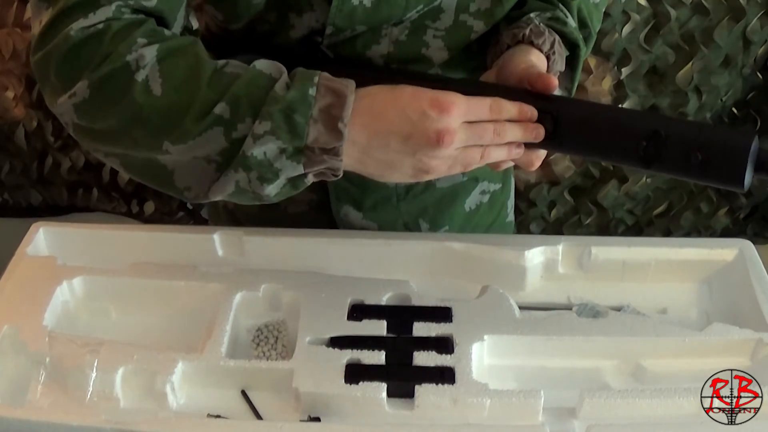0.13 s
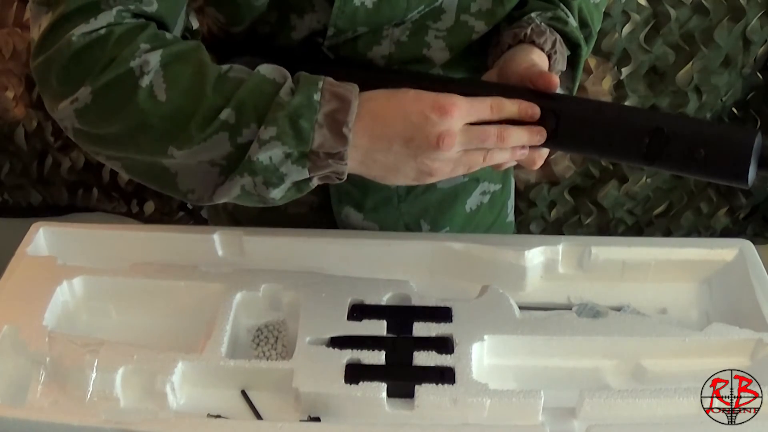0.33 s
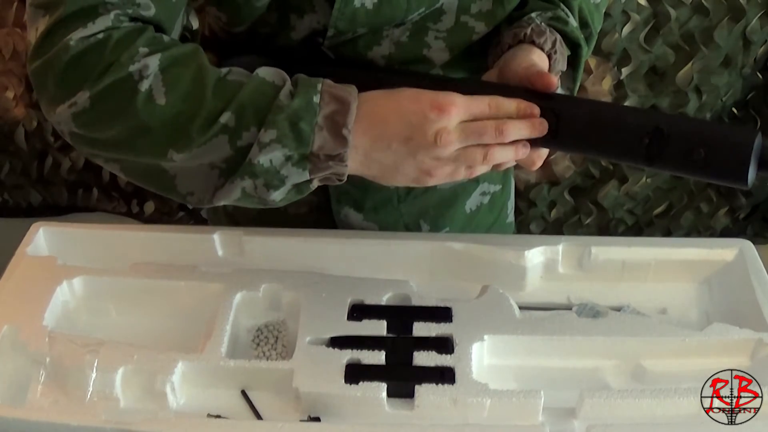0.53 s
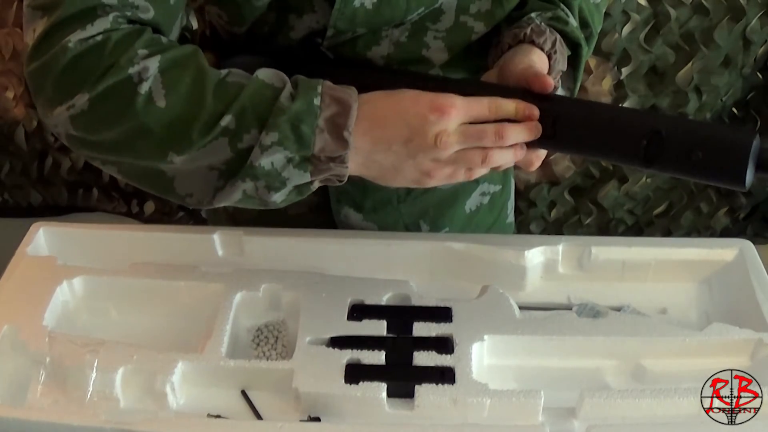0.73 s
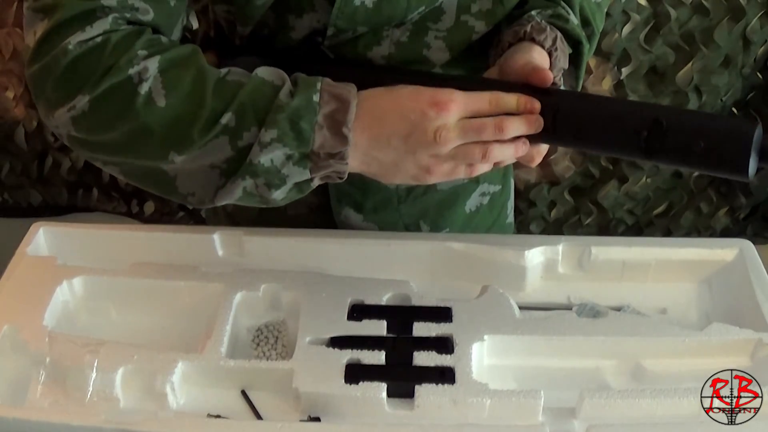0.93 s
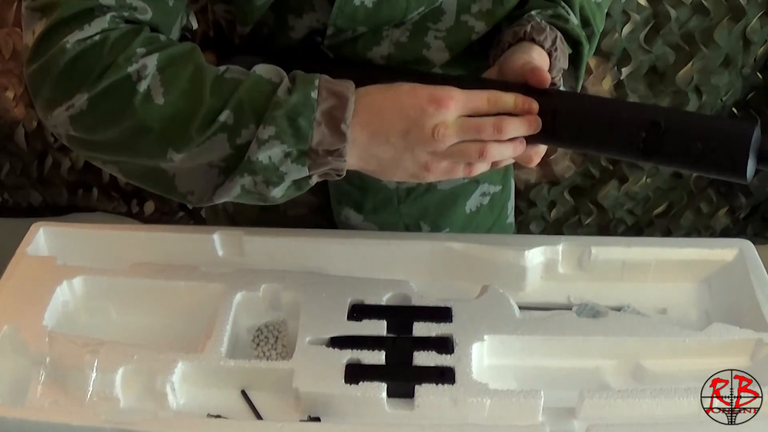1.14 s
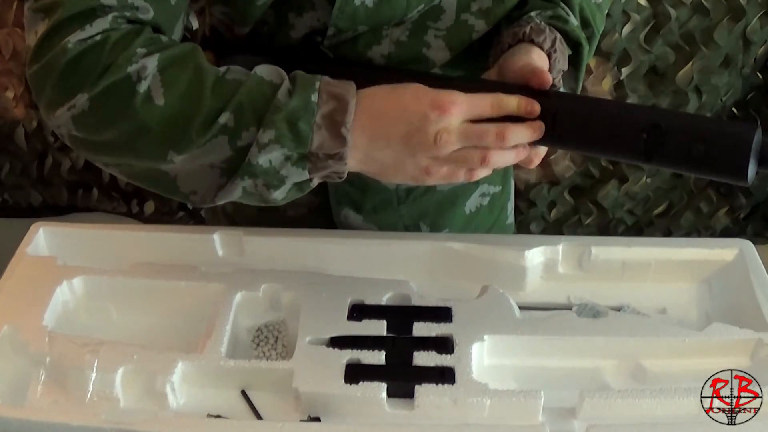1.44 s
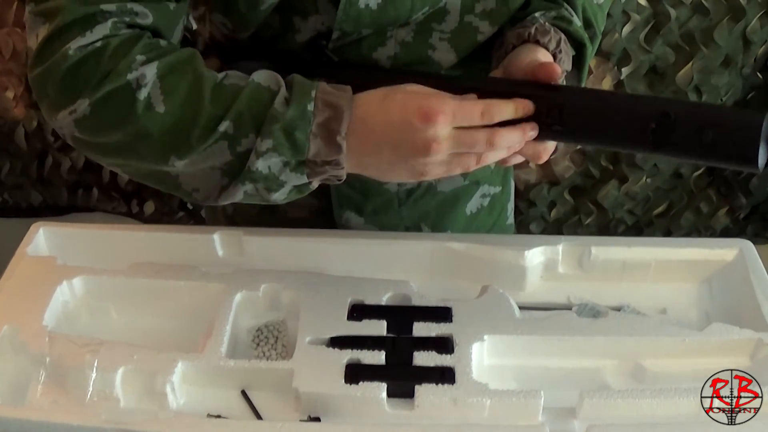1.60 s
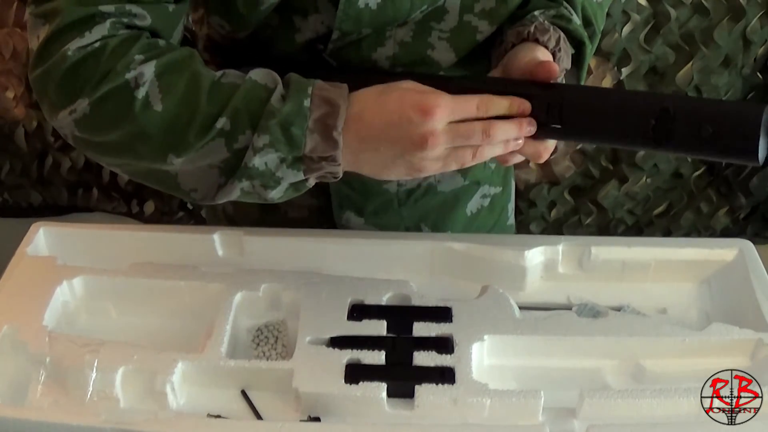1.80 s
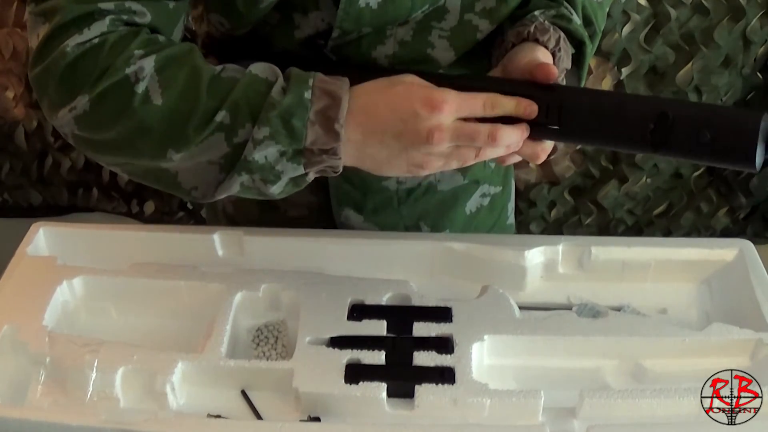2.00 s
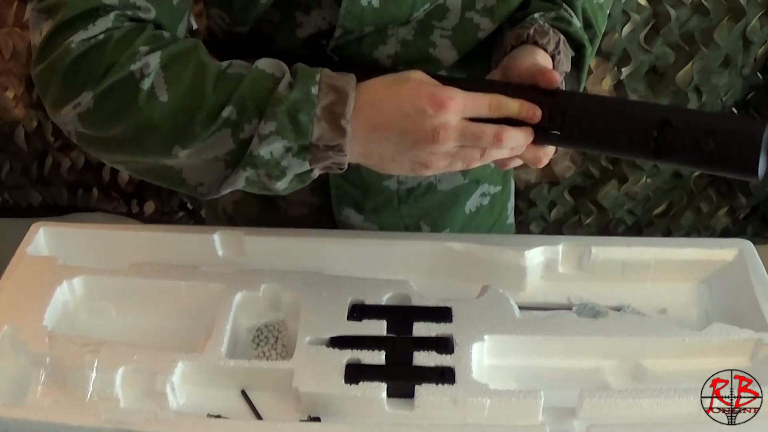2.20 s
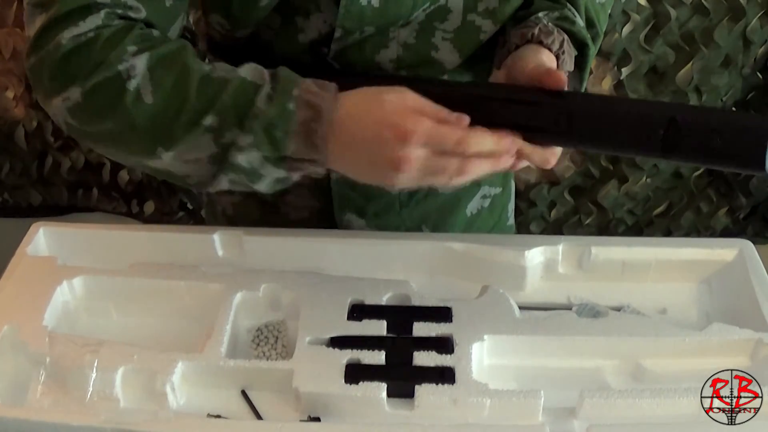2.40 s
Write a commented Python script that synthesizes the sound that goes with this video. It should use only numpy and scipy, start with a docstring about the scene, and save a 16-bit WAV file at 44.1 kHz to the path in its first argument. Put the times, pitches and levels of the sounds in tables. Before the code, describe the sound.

A magazine is fitted into an airsoft rifle, close by in a quiet small room. Light plastic ticks and hollow knocks come in the first half second, with a sharper cluster of clicks at 0.8 seconds and fainter taps from 1.2 to 2. At about 2.1 seconds the catch snaps shut loudly, with a brief metallic ring and rattle. Hands and sleeves rustle softly at the start and end.

```python
"""Hands and sleeves rustle over the faint tone of a small room, as a magazine is worked into an airsoft
rifle. It ticks, scrapes and knocks in the hollow plastic well, each contact shaking the shell, walls,
ribs and metal lips. Then the catch snaps shut, its spring rings and loose parts chatter.
The nearby camera's gain control ducks at the snap and recovers slowly."""
import sys
import numpy as np
from scipy import signal
from scipy.fft import rfft, irfft, next_fast_len
from scipy.io import wavfile
from scipy.ndimage import uniform_filter1d, map_coordinates

SR = 44100
rng = np.random.default_rng(int(sys.argv[2]) if len(sys.argv) > 2 else 0)


def inscribe(sig):
    """Save sig as 16-bit PCM at rate SR to the path in sys.argv[1].

    A 1-D sig is mono; a 2-D sig holds one channel per row.
    Samples are clipped to [-1, 1] before scaling.
    """
    pcm = np.round(np.clip(np.atleast_2d(sig).T, -1, 1) * 32767)
    wavfile.write(sys.argv[1], SR, pcm.astype(np.int16))


N = 112454
HIT_T_S = np.arange(SR // 2) / SR


def amp(db):
    """Decibels to gain."""
    return 10 ** (np.asarray(db) / 20)


def unit_rms(x):
    """Scale to rms 1."""
    return x / np.sqrt(np.mean(x ** 2) + 1e-20)


def unit_hit(x):
    """Scale to the energy of 4 ms at rms 1."""
    return x * np.sqrt(.004 * SR / np.sum(x ** 2))


def curve_at(points, hz):
    """Interpolate (Hz, value) points on a log frequency axis."""
    point_hz, values = np.transpose(points)
    return np.interp(np.log(hz + 1), np.log(point_hz), values)


def filtered(x, response):
    """Apply a zero-phase gain, response(hz)."""
    n = x.shape[-1]
    n_fft = next_fast_len(n + SR // 4)
    return irfft(rfft(x, n_fft) * response(np.fft.rfftfreq(n_fft, 1 / SR)), n_fft)[..., :n]


def coloured(x, spectrum):
    """Filter by (Hz, dB) points."""
    return filtered(x, lambda hz: amp(curve_at(spectrum, hz)))


def stereo(mid_side, width):
    """Mid and side to left and right."""
    mid, side = mid_side
    return np.array([mid + width * side, mid - width * side])


def add(track, start_s, x):
    """Mix x into the track at start_s."""
    i = round(start_s * SR)
    track[:, i:i + x.shape[-1]] += x[..., :N - i]


def noise_tail(spectrum, t60_curve, rise_s, hold_s):
    """Two noises that rise, hold, then decay, each frequency at its own rate."""
    noise = coloured(rng.standard_normal((2, len(HIT_T_S))), spectrum)
    hz, t, bins = signal.stft(noise, SR, nperseg=256)
    fade = amp(-60 * np.maximum(t - hold_s, 0) / curve_at(t60_curve, hz)[:, None])
    tail = signal.istft(bins * fade, SR, nperseg=256)[1][:, :len(HIT_T_S)]
    return tail * (1 - np.exp(-HIT_T_S / rise_s))


def strike(modes, contact_ms):
    """A rough contact shakes each mode; little radiates outside their range."""
    t = HIT_T_S[:SR // 10]
    hz, db, t60_s = np.transpose(modes)[:, :, None]
    force = rng.standard_normal((len(hz), len(t))) * np.exp(-(1000 * t / contact_ms) ** 2 / 2)
    impulse_responses = amp(-60 * t / t60_s) * np.sin(2 * np.pi * hz * t)
    rings = signal.fftconvolve(force, impulse_responses, axes=1)
    band_hz = [hz.min() * .8, min(hz.max() * 1.5, SR * .4)]
    rings = signal.sosfilt(signal.butter(3, band_hz, "band", fs=SR, output="sos"), rings)
    hit = np.sum(amp(db) * [unit_hit(x) for x in rings], axis=0)
    return unit_hit(np.pad(hit, (0, len(HIT_T_S) - len(hit))))


# Room tone and hiss: (frequency [Hz], relative level [dB])
AIR_SPECTRUM = [(15, -56), (25, -31.5), (134, -12), (326, -5.5), (405, -4.5), (659, -6), (1020, -6.5),
                (1130, -6), (1260, -6.5), (2160, -10), (2550, -5.5), (3250, -10.5), (16000, -18)]


def room_tone(level_db=-56, width=.48):
    """Steady background noise, strongest in the low mids."""
    noise = coloured(rng.standard_normal((2, N)), AIR_SPECTRUM)
    return amp(level_db) * stereo(unit_rms(noise), width)


# Hand and sleeve slides: (peak time [s], rise [s], fall [s], level [dB])
SLIDES = [(.02, 0.045, 0.17, -59), (.165, 0.065, 0.073, -53), (.33, 0.047, .05, -47.5),
          (0.741, 0.031, 0.038, -63), (1.101, 0.14, 0.077, -67), (1.68, 0.11, 0.14, -54.5),
          (1.8, 0.11, .08, -55), (2.0, .05, 0.051, -61), (2.53, 0.17, .1, -51.5)]
# Friction noise: (frequency [Hz], relative level [dB])
CLOTH_SPECTRUM = [(100, -27), (400, -2), (900, 7.5), (1700, 4), (3500, 3), (5300, -2), (7500, 0.5),
                  (9500, 2), (12000, -2), (15500, -36)]


def hand_rustle(grain_db=2, grains_per_s=500, width=.13):
    """Grainy friction of skin and cloth, swelling with each slide."""
    t = np.arange(N) / SR
    power = sum(amp(db) ** 2 * np.exp(-2 * ((t - peak_s) / np.where(t < peak_s, rise_s, fall_s)) ** 2)
                for peak_s, rise_s, fall_s, db in SLIDES)
    roughness = map_coordinates(rng.standard_normal(SR // 10), [t * grains_per_s], mode="wrap")
    friction = coloured(rng.standard_normal((2, N)) * amp(grain_db * roughness), CLOTH_SPECTRUM)
    return np.sqrt(power) * stereo(unit_rms(friction), width)


# Magazine touching the well; the spot touched sets the pitch: (time [s], hollow knock [dB],
# wall clack [dB], rib snap [dB], metal tick [dB], edge fizz [dB], contact length [ms], pitch [ratio])
WELL_CONTACTS = [ (.114, -54, -58, -54, -69, -75, 6, 0.9), (0.1692, -44.5, -46, -56, -67, -75, 3.2, 1.02),
                 (.177, -44, -46.5, -48, -66, -75, 8, 0.97),
                 (0.1886, -47, -59, -38.5, -37, -43.5, 1.27, 0.9),
                 (0.3482, -33, -32.5, -44, -38.5, -65, 2.4, 0.97),
                 (0.3532, -43, -47, -38.5, -46.5, -60, 0.96, 1.04),
                 (0.4083, -68, -60, -49, -45.5, -57, 5.4, 1.09),
                 (0.5409, -44, -49, -38, -53, -65, 2.1, 1.05),
                 (0.547, -49, -45, -34.5, -38, -39.5, 0.81, 0.95),
                 (.742, -53.5, -58, -65, -70, -80, 2.5, 1.03), (0.805, -42.5, -46, -47, -48, -75, 10, 1.05),
                 (0.8127, -43, -46, -34.5, -24.5, -52, 3.2, 0.98),
                 (.822, -32, -41, -31.5, -38, -48, 1.9, 1.23),
                 (0.8239, -40, -39, -30.5, -20, -44, 4.6, 0.99),
                 (0.8263, -37.5, -31, -31, -23, -27.5, 1, 0.9), (.831, -33, -27, -32, -39, -39, 4.3, .98),
                 (1.0546, -58, -61, -71, -60, -58, 1.5, 0.93),
                 (1.2408, -70, -43.5, -43, -40, -65, 5.4, 1.03),
                 (1.2443, -32, -45.5, -42.5, -52, -56, 1.52, 0.972),
                 (1.5087, -58, -61, -66, -47.5, -57, 1.8, 1.04),
                 (1.5363, -60, -55, -51.5, -49.5, -55, 2.9, 0.904),
                 (1.5784, -55, -53, -54, -45, -48, 1.7, 0.97),
                 (1.5815, -45.5, -65, -65, -65, -75, 2.4, 1.08),
                 (1.6455, -42, -54.5, -55, -55, -75, 5.2, 0.93), (1.807, -51, -70, -70, -68, -80, 7.6, .95),
                 (2.007, -53.5, -69, -70, -70, -82, 5.5, 1.07), (2.105, -46, -54, -58, -58, -68, 3.2, 0.83),
                 (2.113, -40.5, -56, -56, -56, -70, 1.8, 1.09),
                 (2.1178, -36.5, -42, -52, -35, -42, 1.3, .95),
                 (2.300, -43.5, -56, -47.5, -56, -67, 11, 0.954),
                 (2.360, -48, -63, -54, -54, -76, 1.3, 1.14)]
# Modes of the five parts: (frequency [Hz], relative level [dB], t60 [s])
HOLLOW_MODES = [(780, -5, .04), (875, -3, .045), (1040, 0, .034), (1130, -2, .032), (1280, -9, .022)]
WALL_MODES = [(1606, -9, 0.036), (1710, 1, 0.042), (2025, -2.5, 0.0072), (2470, 1.5, 0.016)]
RIB_MODES = [(2870, 0.5, 0.0028), (3330, 2.5, 0.0039), (3850, 3, 0.0046), (4540, 1, 0.004)]
METAL_MODES = [(5100, -12, 0.001), (6770, -2.5, 0.0082), (7260, -31, 0.0028), (7960, 0, 0.0034),
               (9040, -5.5, 0.0049), (9640, -0.5, 0.0017), (9630, 0.5, 0.0026)]
EDGE_MODES = [(11260, -3.5, 0.0019), (12540, -4, 0.005), (13070, -3, 0.0048), (14500, -4, .003)]


def magazine_knocks():
    """Each contact rings the hollow shell, plastic walls and ribs, metal lips and edges in its own mix."""
    out = np.zeros((2, N))
    parts = (HOLLOW_MODES, WALL_MODES, RIB_MODES, METAL_MODES, EDGE_MODES)
    for start_s, *levels_db, contact_ms, pitch in WELL_CONTACTS:
        knock = sum(amp(db) * strike(np.multiply(modes, [pitch, 1, 1]), contact_ms)
                    for db, modes in zip(levels_db, parts))
        add(out, start_s, in_room(knock))
    return out


# Room echo colour: (frequency [Hz], relative level [dB])
ECHO_SPECTRUM = [(300, -10.5), (1200, -3), (3500, -7), (8000, -10), (14000, -8)]
# Room echo decay: (frequency [Hz], t60 [s])
ECHO_DECAY = [(300, 0.5), (1000, 0.22), (4000, 0.25), (9000, 0.23), (15000, 0.15)]


def in_room(hit, width=.37):
    """Direct sound plus the small room's diffuse echo."""
    response = noise_tail(ECHO_SPECTRUM, ECHO_DECAY, rise_s=.0013, hold_s=0) / np.sqrt(SR * .016)
    echo = signal.fftconvolve(hit[None], stereo(response, width), axes=1)
    return hit + echo[:, :len(HIT_T_S)]


# Catch landing, then seating: (time [s], level [dB])
CATCH_HITS = [(2.1197, -5.5), (2.1204, -7)]
# Catch modes: (frequency [Hz], relative level [dB], t60 [s])
CATCH_MODES = [(3530, -3.5, .008), (3480, -8, 0.0034), (4580, -12, 0.002), (6430, -2, 0.0062),
               (7430, -1.5, .007), (8900, -4, 0.014), (10180, 2, 0.017), (10650, 0, .007),
               (12300, -4, 0.018), (12000, -16, 0.0075), (13600, -3, .007), (15100, -9, 0.01)]


def catch_snap():
    """The catch snaps home in two short, bright blows."""
    out = np.zeros((2, N))
    for start_s, db in CATCH_HITS:
        add(out, start_s, in_room(amp(db) * strike(CATCH_MODES, contact_ms=.32)))
    return out


# Spring and receiver modes: (frequency [Hz], relative level [dB], t60 [s])
SPRING_MODES = [(870, -15, .33), (2164, -7, .26), (2632, -9, .34), (3284, 1, .16), (3660, -8, .25),
                (6121, -6, .24), (7496, 1, .22), (8773, -3, .24), (9088, 0, .22), (9832, 0, .17),
                (10150, -3, .25), (10908, -1, .25), (11458, -7, .21), (11947, -7, .22), (13270, -9, .2),
                (14756, -9, .2)]


def spring_ring(rise_s, level_db=-8, scatter_db=1):
    """The snap sets spring and receiver ringing in damped modes; returns mid and side."""
    hz, db, t60_s = np.transpose(SPRING_MODES)[:, :, None]
    decay = amp(-60 * HIT_T_S / t60_s)
    onset = 1 - np.exp(-HIT_T_S / rise_s)
    mid_side = []
    for _ in range(2):
        gain = amp(db + scatter_db * rng.standard_normal(hz.shape))
        phase = 2 * np.pi * rng.random(hz.shape)
        ring = np.sum(gain * decay * np.sin(2 * np.pi * hz * HIT_T_S + phase), axis=0)
        mid_side.append(unit_hit(ring * onset))
    return amp(level_db) * np.array(mid_side)


# Chatter colour: (frequency [Hz], relative level [dB])
CHATTER_SPECTRUM = [(300, -49), (600, -30), (850, -15.5), (1700, -19), (2600, -8.5), (3200, 0),
                    (3800, -1.5), (4250, -15.5), (4800, -4.5), (5400, -11.5), (6050, 1), (6600, -8.5),
                    (7400, 2), (8100, -5.5), (9000, 2.5), (10500, 1.5), (12400, -4.5), (13300, -10),
                    (14200, -13), (14900, -8), (16000, -19)]
# Chatter decay: (frequency [Hz], t60 [s])
CHATTER_DECAY = [(800, 0.34), (3000, .25), (9000, .23), (15000, 0.18)]


def loose_chatter(rise_s, hold_s=.036, level_db=-1.07):
    """Loose parts buzz briefly after the snap, then die away; returns mid and side."""
    mid_side = noise_tail(CHATTER_SPECTRUM, CHATTER_DECAY, rise_s, hold_s)
    return amp(level_db) * np.array([unit_hit(x) for x in mid_side])


# Background width: (frequency [Hz], side gain [dB])
SIDE_SPECTRUM = [(60, -11), (130, -4), (250, -2.5), (500, 6.5), (4000, 3), (7000, -1), (11000, -19.5),
                 (16000, -23)]


def scene(pan_db=.37, ring_rise_s=.0035):
    """The rifle sits just right of centre, over a background that narrows in the bass and treble."""
    left, right = hand_rustle() + room_tone()
    side = coloured(left - right, SIDE_SPECTRUM)
    background = stereo([left + right, side], width=1) / 2
    rifle = magazine_knocks() + catch_snap()
    snap_s = CATCH_HITS[0][0]
    ringing = spring_ring(ring_rise_s) + loose_chatter(ring_rise_s)
    add(rifle, snap_s, stereo(ringing, width=.24))
    return background + rifle * amp([[-pan_db], [pan_db]])


def record(dry, threshold_db=-15.5, duck_share=.6, release_db_per_s=8.5, cutoff_hz=15950):
    """Gain control ducks at once on a loud sound and recovers slowly; a steep low-pass follows."""
    power = uniform_filter1d(np.mean(dry ** 2, axis=0), size=128)
    level_db = 10 * np.log10(np.abs(power) + 1e-12)
    target_duck_db = duck_share * np.maximum(level_db - threshold_db, 0)
    recovery_db = release_db_per_s * np.arange(N) / SR
    duck_db = np.maximum.accumulate(target_duck_db + recovery_db) - recovery_db
    return filtered(dry * amp(-duck_db), lambda hz: 1 / (1 + (hz / cutoff_hz) ** 160))


dry = scene()
out = record(dry)
inscribe(out)
```